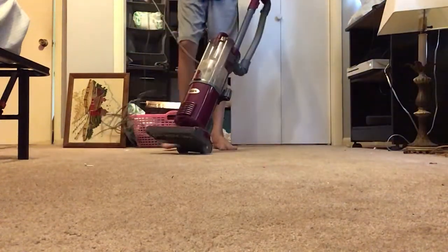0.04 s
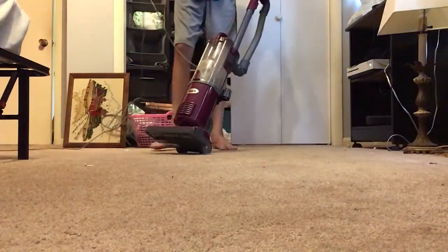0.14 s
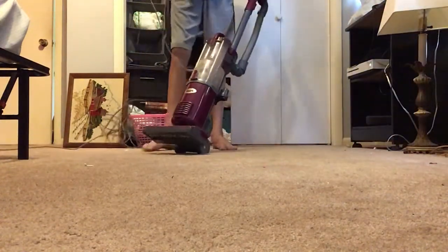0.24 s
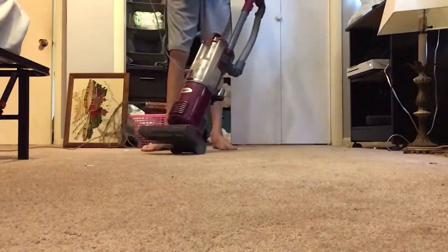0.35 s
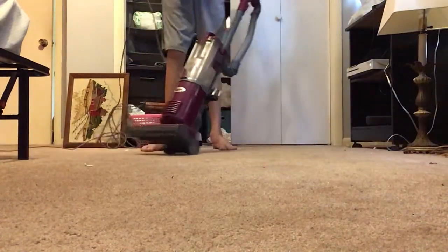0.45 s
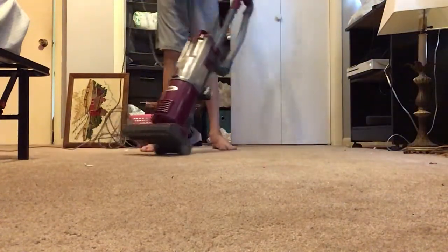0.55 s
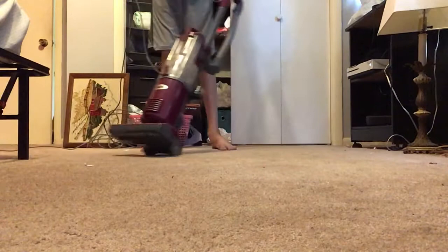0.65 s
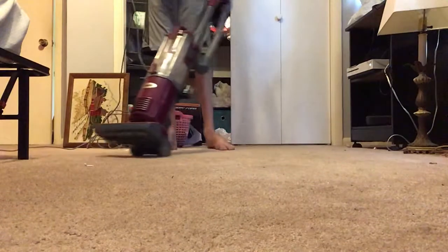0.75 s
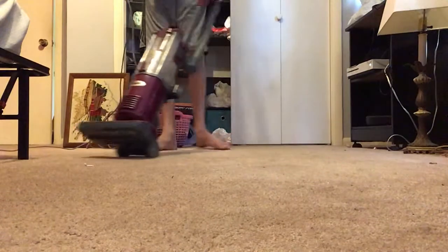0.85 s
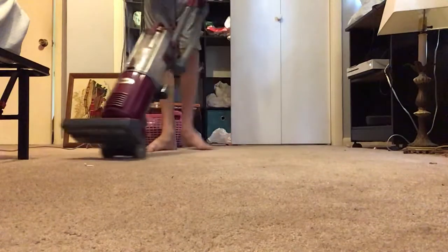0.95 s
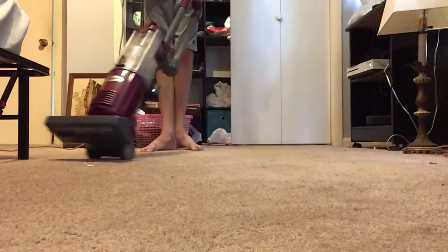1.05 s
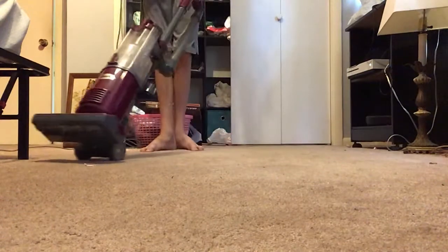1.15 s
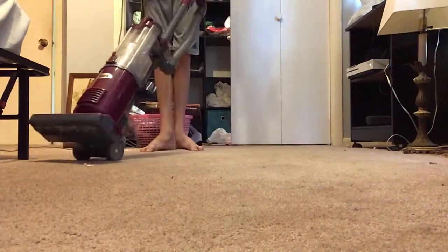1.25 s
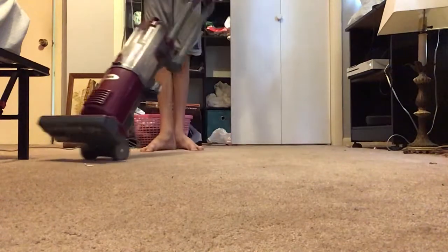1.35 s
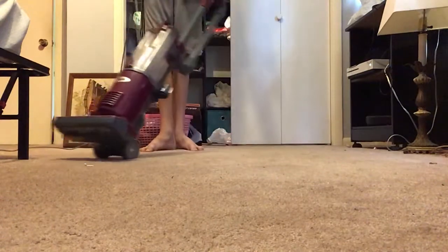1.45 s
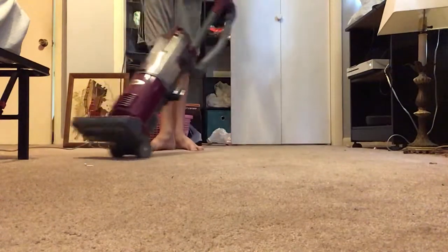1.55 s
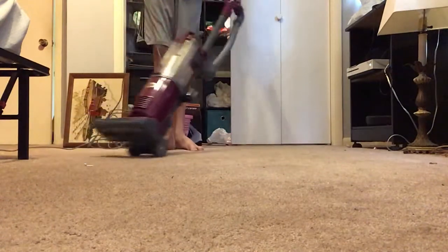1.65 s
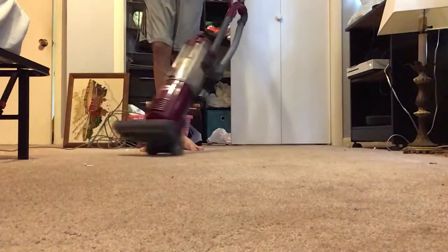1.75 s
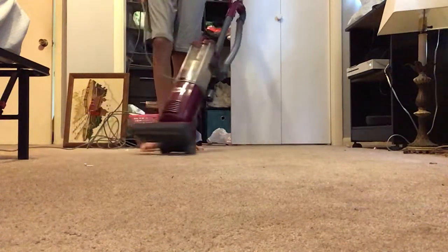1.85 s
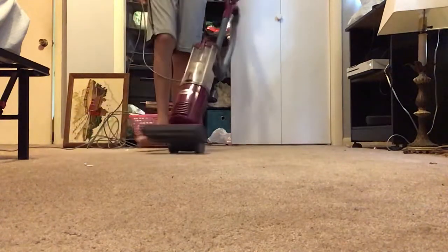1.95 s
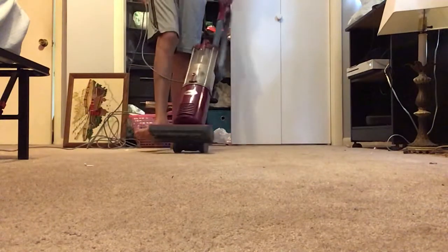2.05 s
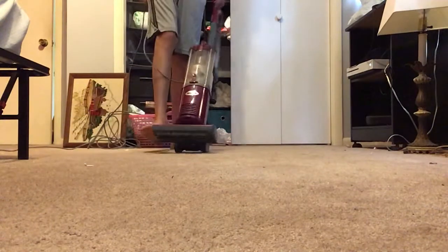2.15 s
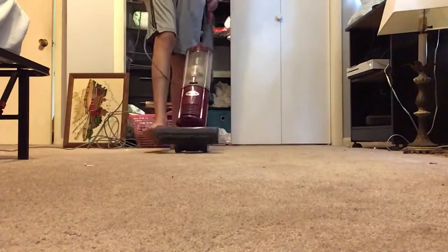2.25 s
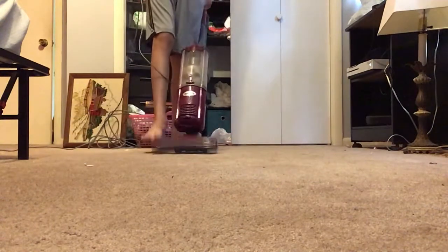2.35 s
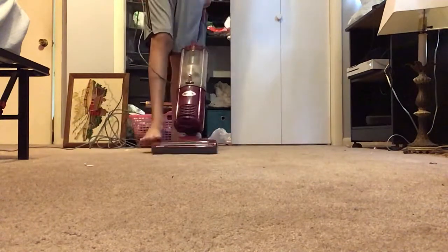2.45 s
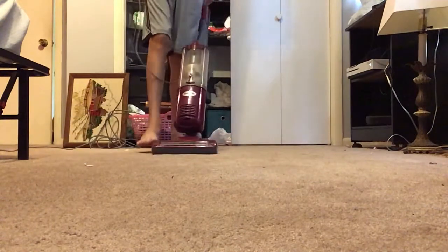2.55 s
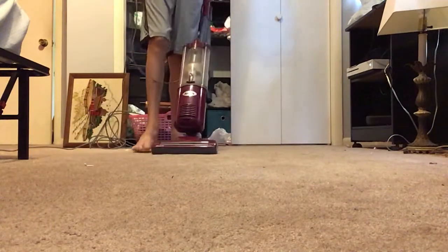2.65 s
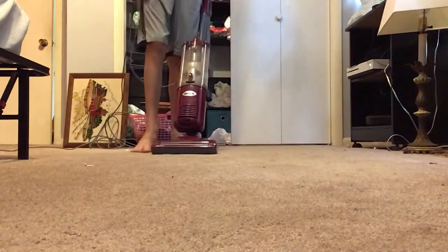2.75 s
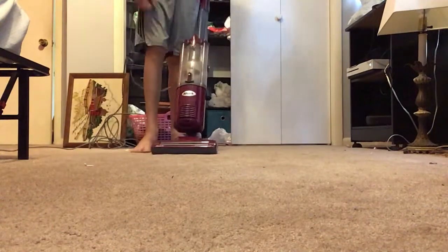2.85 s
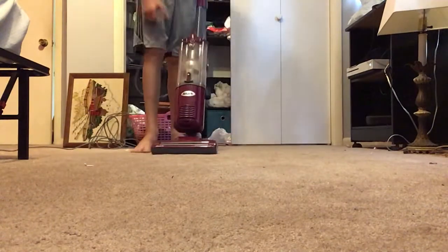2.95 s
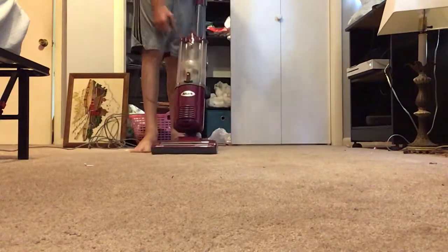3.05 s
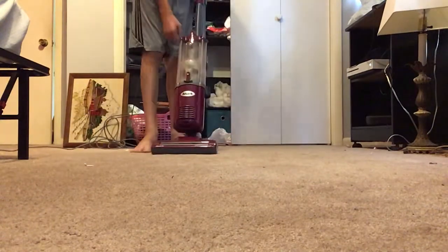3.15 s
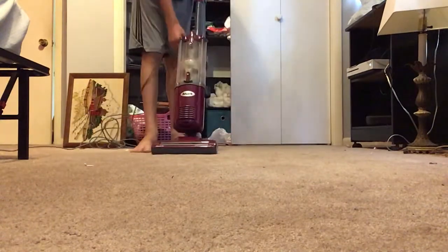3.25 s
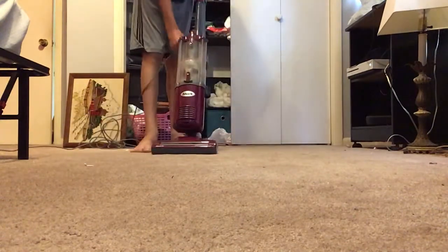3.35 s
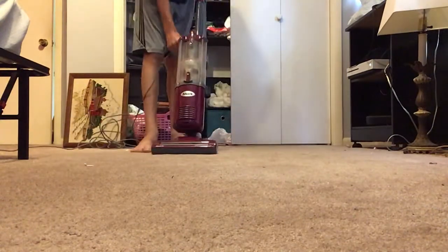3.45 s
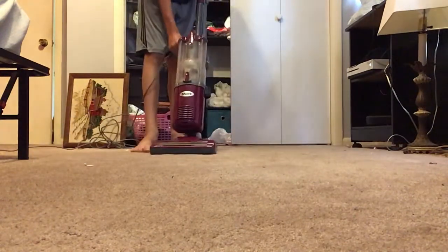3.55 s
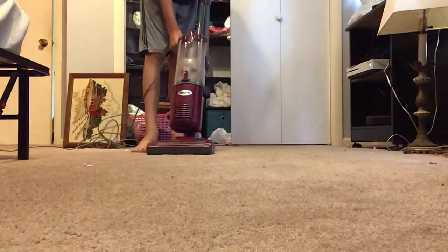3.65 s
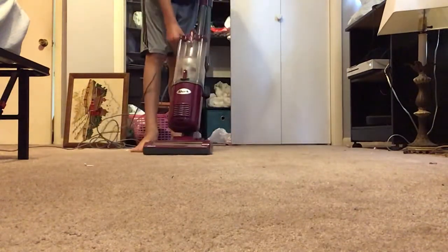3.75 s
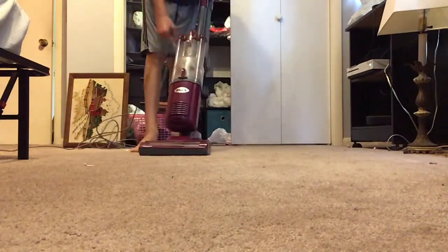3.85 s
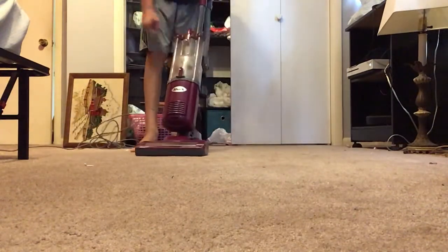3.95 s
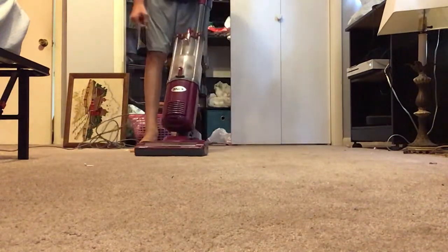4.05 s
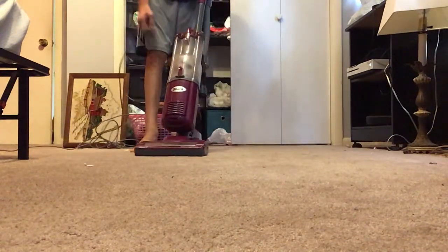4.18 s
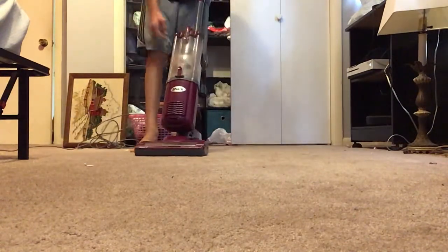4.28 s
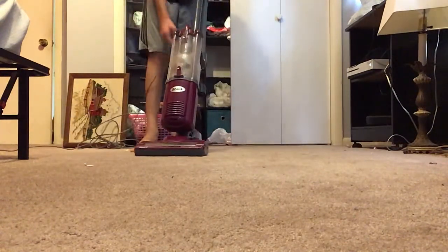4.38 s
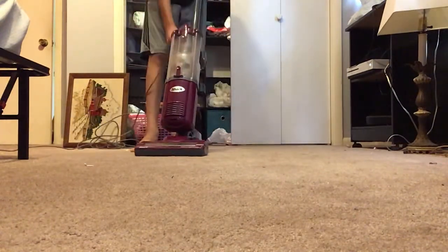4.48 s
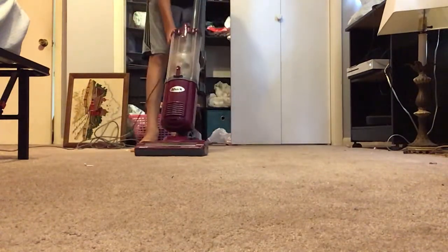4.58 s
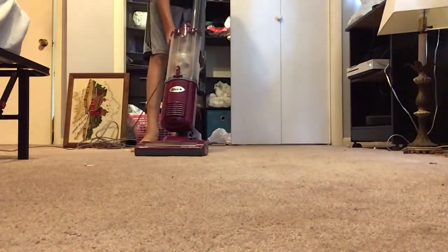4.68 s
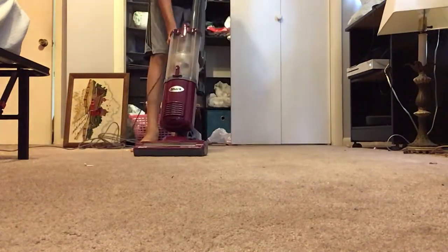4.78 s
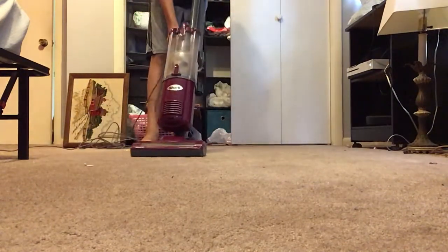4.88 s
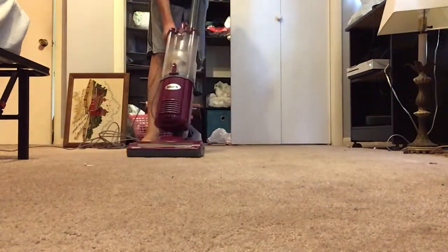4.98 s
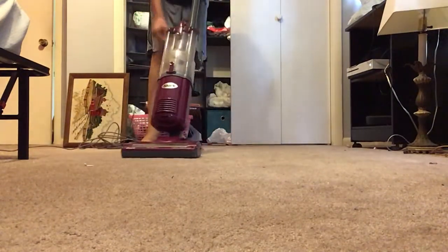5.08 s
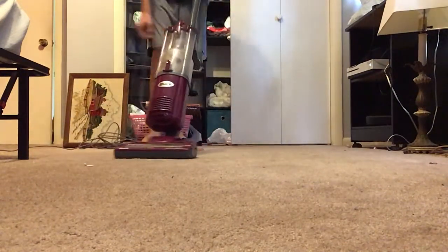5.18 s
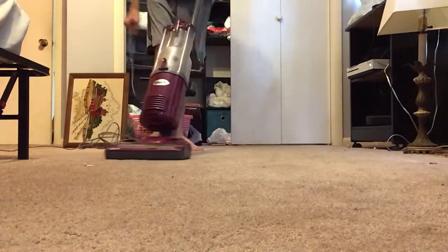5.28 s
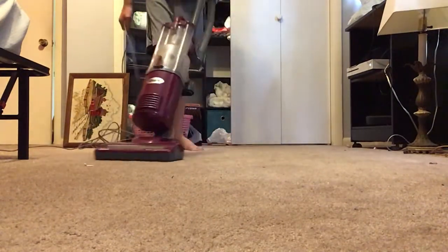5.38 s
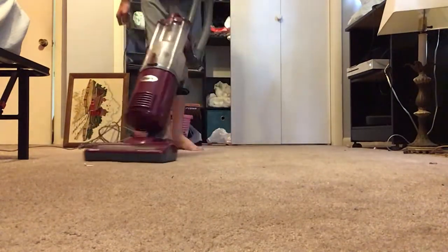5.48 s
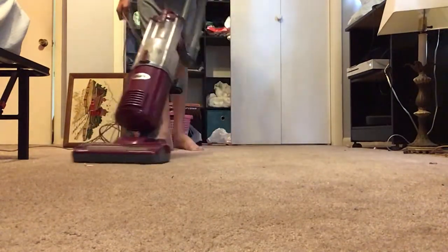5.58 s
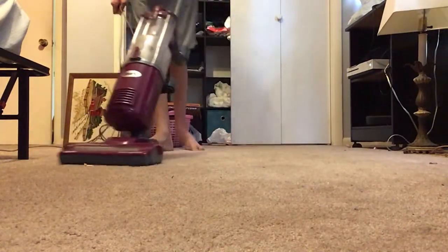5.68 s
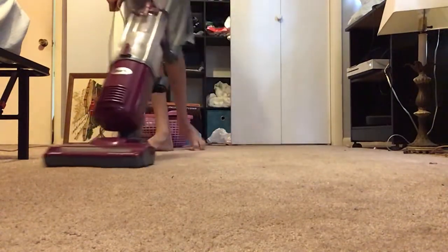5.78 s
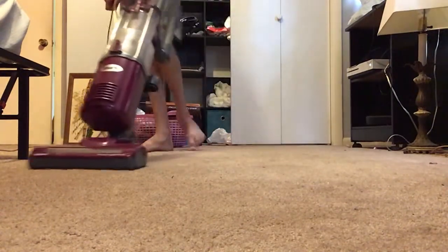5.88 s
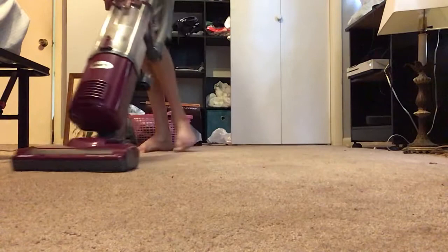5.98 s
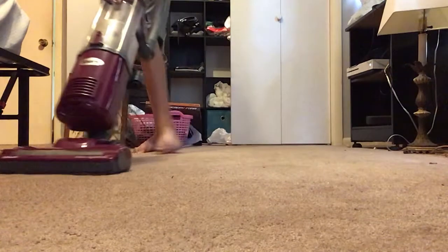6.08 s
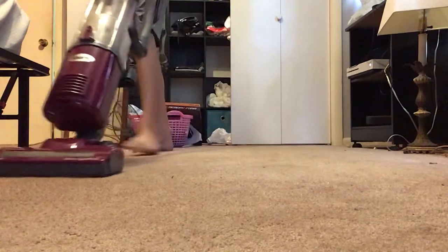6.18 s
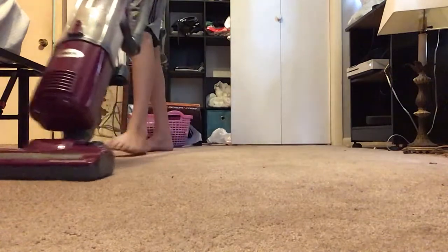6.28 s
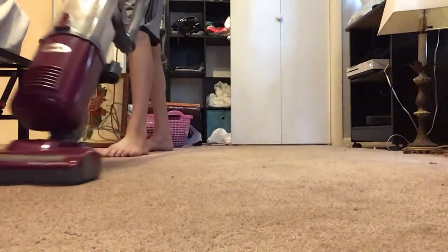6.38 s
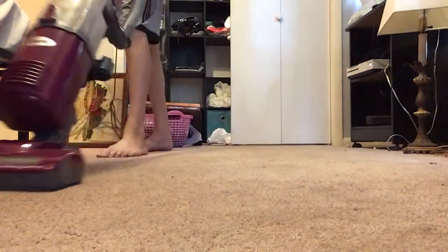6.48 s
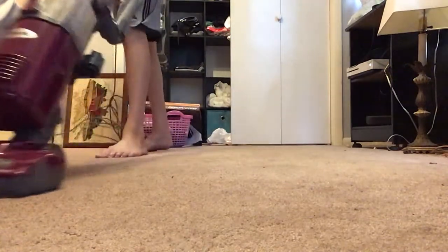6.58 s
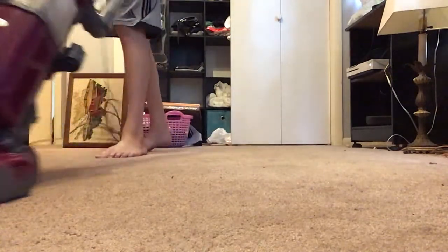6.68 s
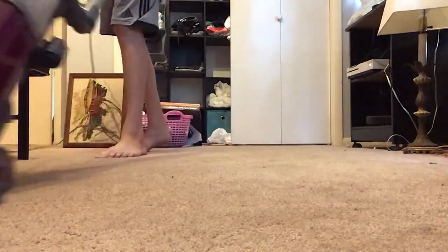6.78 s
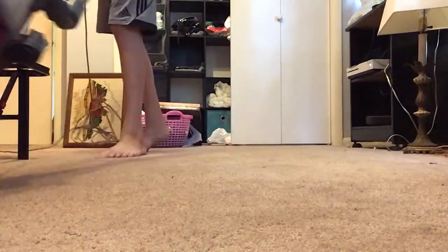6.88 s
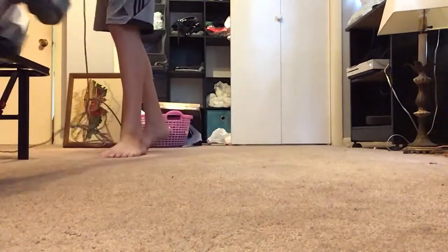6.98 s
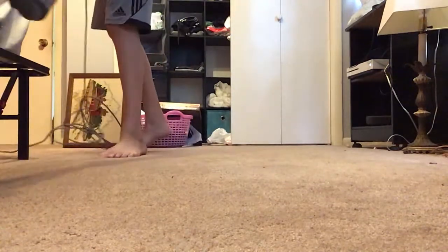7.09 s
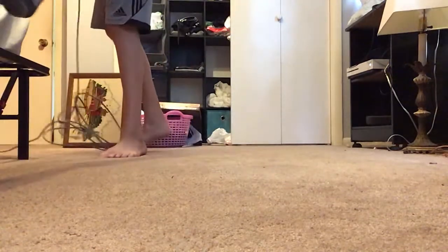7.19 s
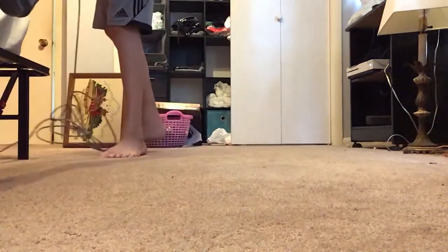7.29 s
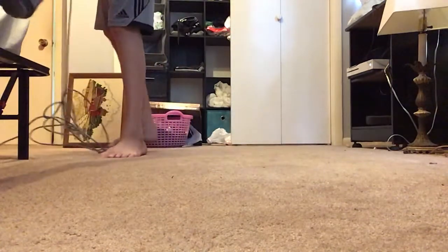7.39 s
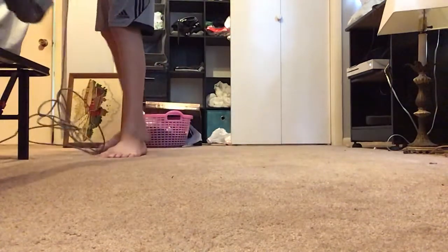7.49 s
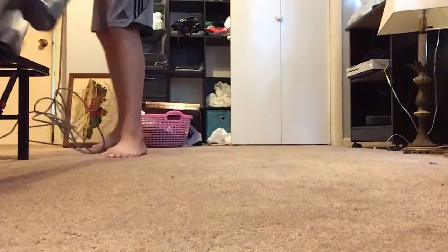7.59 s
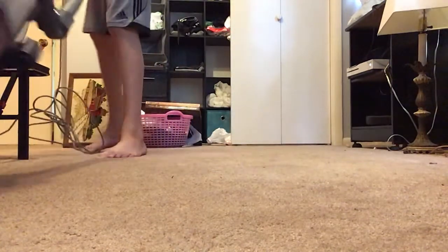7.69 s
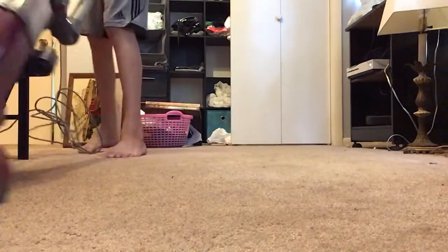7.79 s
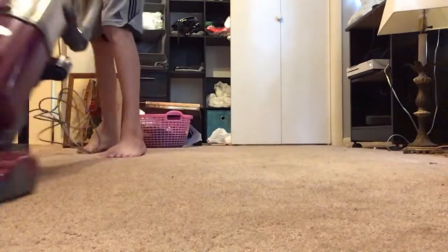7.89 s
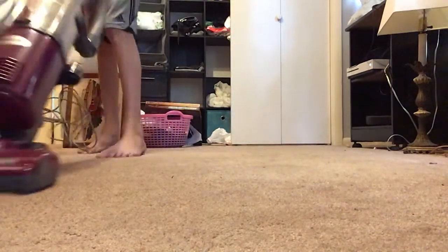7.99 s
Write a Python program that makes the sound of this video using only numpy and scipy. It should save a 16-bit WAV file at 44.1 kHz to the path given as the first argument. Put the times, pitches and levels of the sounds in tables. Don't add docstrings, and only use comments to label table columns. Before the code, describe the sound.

In a softly furnished bedroom, a switched-off upright vacuum rolls over carpet with a plastic clack, faint rattles and dull footfalls. It clicks upright with a sharp snap and a heavy floor thump. The motor bursts on, immediately winds down, then restarts into a steady roar and high whine, brush throbbing and grit ticking as it passes close to a floor-level microphone.

```python
import sys
import numpy as np
from scipy import signal
from scipy.fft import rfft, irfft, next_fast_len
from scipy.io import wavfile
from scipy.ndimage import uniform_filter1d, map_coordinates

SR = 44100
rng = np.random.default_rng(int(sys.argv[2]) if len(sys.argv) > 2 else 0)


def linear_from_db(decibels):
    return 10 ** (np.asarray(decibels, float) / 20)


def generate_wav(signal):
    frames = np.transpose(np.atleast_2d(signal))
    scaled = np.clip(frames, -1, 1) * 32767
    pcm = np.round(scaled).astype(np.int16)
    wavfile.write(sys.argv[1], SR, pcm)


N = 354123

# pitch_hz, t60_s
BEDROOM = [(200, 0.12), (2000, 0.69), (10000, 0.047)]

# start_s, level_db
STEPS = [(.02, -59), (.14, -45), (.41, -61), (.65, -51), (.88, -50), (1.16, -54), (1.4, -52), (1.6, -56),
         (1.74, -56), (1.89, -67), (2.14, -53), (2.45, -26.5), (2.75, -45.5), (2.9, -51), (3.05, -47),
         (3.2, -48.5), (3.48, -46), (4.42, -39)]
STEP_RISE_S, STEP_T60_S = .04, .65
# start_s, effort_db
PUSH = [(0, -44), (.3, -51), (.55, -55.5), (.78, -59), (.9, -54), (1.12, -55.5), (1.35, -60), (1.6, -56.5),
        (1.75, -52.5), (2.0, -60.5), (2.17, -54.5), (2.3, -61), (2.6, -59), (3.25, -60), (3.46, -53)]
# start_s, wheels_db, rustle_db
JOLTS = [
    (.12, -37, -53.5),
    (2.36, -35, -40.5),
]
JOLT_RISE_S, JOLT_T60_S = 0.044, 0.27
# pitch_hz, level_db
WHEEL_COLOUR = [(53, -55), (90, 2), (194, 0.5), (375, -5.5), (505, -9), (655, -11.5), (2000, -35.5),
                (2600, -67), (4400, -120)]
# pitch_hz, level_db
RUSTLE_COLOUR = [(470, 1), (800, -30), (953, -6.5), (2260, -3.5), (2530, -4), (9520, -11.5), (13200, -14.5),
                 (15900, -32)]
HISS_DB, RUSTLE_SHARE = -66.5, 0.38

# start_s, level_db, knock_db, edge_db
KNOCKS = [(0.0781, -21, 2, -11.5), (0.094, -26, -2, -40), (0.3, -48, 10, -30), (0.587, -34.5, -19, -15),
          (0.8354, -57, 7, -14), (0.9194, -59, 4, -12), (1.4192, -52.5, -1, -3), (1.667, -49, -13, -3.5),
          (1.709, -46, 6.5, -25), (1.8054, -58, -2, -5), (2.161, -45.5, -0.5, -7), (2.2204, -47.5, -3, -10),
          (2.276, -49, 7, -10), (2.2954, -13.5, -13, -5.5), (2.3054, -23.5, -23, -21),
          (2.3456, -32.5, 0, -16), (2.388, -37.5, -20, -7), (2.857, -55.5, 12.5, -20),
          (3.476, -35.5, -1, -11), (4.702, -34.5, -3.5, -4)]
# start_s, level_db, knock_db, edge_db
SCUFFS = [(0.015, -45, 9, -30), (0.233, -40.5, -21, -11.5), (0.598, -48.5, -12, -27),
          (3.2404, -48.5, -8, -7.5), (3.275, -42, -8, -14)]
KNOCK_T60_S, SCUFF_T60_S = 0.14, 0.37
# pitch_hz, level_db
KNOCK_COLOUR = [(35, -43), (60, -76), (235, 6.5), (888, -0.5), (1070, -43), (1200, -4), (1560, -26),
                (2640, -120)]
# pitch_hz, level_db
CLACK_COLOUR = [(530, -45), (900, -8.5), (2530, -1.5), (2870, -6.5), (3140, -2.5), (6500, -19.5),
                (8450, -58), (14300, -120)]
# pitch_hz, level_db
EDGE_COLOUR = [(3240, -15), (5500, 6.5), (8390, 4), (10400, -1.5), (13300, -4), (15900, -18)]
# start_s, level_db
THUMPS = [(0.086, -41), (2.341, -25), (2.362, -11), (2.394, -19.5), (2.435, -39)]
# pitch_hz, level_db, t60_s
FLOORBOARDS = [(68, -9, 0.51), (83.6, -7, 0.35), (106.6, 4.5, 0.25), (156.3, -8.5, 0.22),
               (229, -18.5, 0.21), (337, -5.5, 0.044)]
# pitch_hz, level_db, t60_s
SPRING = [(1700, -53.5, 0.82), (2680, -44.5, 0.35), (3040, -47, 0.31), (5240, -45, 0.39), (5240, -48, 0.36)]
# start_s, level_db
POPS = [(.017, -34), (.081, -36), (1.712, -56), (2.276, -48), (2.296, -14.5), (2.858, -56)]
# pitch_hz, level_db, t60_s
SHELL = [(620, -1.5, 0.048), (930, -18, 0.0094)]
# start_s, level_db
GRIT = [(6.054, -44), (6.0934, -31), (6.3523, -31), (6.4386, -37), (6.685, -27), (6.7888, -34), (6.93, -32),
        (6.9683, -33), (7.061, -23), (7.2315, -23), (7.2944, -24), (7.375, -23), (7.4194, -31), (7.46, -26),
        (7.571, -24), (7.6389, -40), (7.77, -35), (8.0111, -33), (4.22, -57), (4.46, -50), (4.705, -36.5)]

# start_s, share_0_to_1
POWER = [
    (3.47, 0),
    (3.5, 0.88),
    (3.72, 0.81),
    (3.84, 0.02),
    (4.688, 0.05),
    (4.706, 0.98),
]
# fan_start_s, off_s, brush_start_s
SWITCH = [
    (3.4455, 3.6586, 3.459),
    (4.6863, 9, 4.675),
]
FULL_HZ, SETTLE_PER_S, PULL_PER_TURN, COAST_S = 628.6, 5.184, .0049, 1.0165
BRUSH_UP_S, BRUSH_STOP_S, BELT_SLACK_S = .044, .125, .012
PILE_DRAG = .006
# start_s, brush_hz, nearness_db, tooth_whine_db
STROKE = [(3.52, 98.75, 4, -37.5), (3.66, 107.6, 0.5, -41.5), (4.71, 105.2, 1.5, -37),
          (4.9, 104.5, 2, -41.5), (5.05, 101.6, 1.5, -41.5), (5.38, 101.8, 0.5, -43), (5.6, 105.6, 1, -46),
          (5.9, 106.6, 1.5, -42), (6.05, 107.7, 3, -61), (6.25, 107.5, 2.5, -44.5), (6.35, 107.4, 3.5, -36),
          (6.6, 106.9, 3.5, -37.5), (6.85, 108.6, 6, -31), (7.1, 110.9, 7, -31), (7.45, 110.7, 7, -29.5),
          (7.8, 108.4, 5, -32.5), (8.03, 108.2, 3.5, -45)]

# start_s, level_db
BITES = [(3.5, -48), (3.66, -32.5), (4.95, -39), (5.1, -46), (5.24, -31), (5.8, -33), (5.95, -29),
         (6.27, -29), (6.44, -30), (7.15, -27.5), (7.27, -27), (7.46, -21.5), (7.62, -34), (7.8, -37),
         (7.92, -45), (8.02, -32)]
THROB_DB, BITE_S = -46.5, 0.064
# multiple of brush turns, level_db over rumble
BRISTLES = [(2, -10), (3, -9.5), (4, -15), (5, -17), (7, -22)]
# multiple of brush turns, level_db over whine
TEETH = [(18, 0.5), (19, -11), (20, -32), (17, -10.5), (16, -12)]

# pitch_hz, level_db
DRIVEN = [(18, -70), (30, -82), (100, -2), (141, -7), (327, -1), (511, -5), (630, -6), (682, -10),
          (1460, -14.5), (2000, -14), (3290, -14), (3850, -19), (12600, -32), (15900, -46)]
# pitch_hz, level_db
COASTING = [(35, -55), (60, -9), (249, 1), (664, -8), (900, -18.5), (1280, -25), (1690, -19.5), (2830, -17),
            (3330, -20), (3830, -25.5), (8470, -26), (14000, -35), (15900, -54)]
# pitch_hz, width_hz, level_db
DUCTS = [(2830, 290, 4), (3290, 430, -6.5), (3920, 490, 8.5), (4797, 120, 8.5), (5740, 290, 3.5),
         (7730, 200, 3.5), (14800, 2000, 3)]
# driven_db at full speed, dB per dB of speed, coasting_db,
# dB per dB of speed, share of nearness
FLOWS = [(-30.5, 0.83, -32, 1.84, 0.64), (-35.5, 1.66, -35.5, 2.23, 1), (-38, 2, -44, 2, 0.4)]
SPIN_UP_S = 0.022

# multiple of shaft turns, level_db over hiss, blur_rad
FAN_ORDERS = [(12, -22, .9), (14, -23.5, .9), (21, -22, 1.2), (24, -25, 1.5), (36, -25, 3), (48, -22, 3.2)]
# multiple of shaft turns, level_db
BEARING = [(2.64, -58), (4.36, -58.5)]
# pitch_hz, width_hz, level_db
BLADE_PATH = [(1704, 236, 19.5), (2230, 590, 6.8), (2764, 350, 21.4), (3086, 340, 16), (3950, 460, 25.2),
              (4257, 610, 13)]
BLADE_DB, STALL_DB = -64.5, 3
# pitch_hz, level_db
SHAFT_PATH = [(170, -62), (215, -52), (255, -43), (300, -57), (400, -52), (470, -56), (550, -34),
              (628, -38)]


def unit(x):
    return x / np.sqrt(np.mean(x ** 2) + 1e-20)


def along(points, hz):
    f, v = np.transpose(points)
    return np.interp(np.log(hz + 1), np.log(f + 1), v)


def curves(rows):
    s, *columns = np.transpose(rows)
    return [np.interp(np.arange(N) / SR, s, column) for column in columns]


def resonances(rows, hz):
    return sum(db / (1 + (2 * (hz - centre) / width) ** 2) for centre, width, db in rows)


def decay(t, t60):
    return linear_from_db(-60 * t / t60)


def swells(rows, rise, t60):
    t = np.arange(N) / SR
    total = 0
    for s, db in rows:
        rising = np.exp(-((t - s) / rise) ** 2)
        total = total + linear_from_db(db) * np.where(t < s, rising, decay(np.maximum(t - s, 0), t60))
    return total


def wobble(rate):
    knots = rng.standard_normal(int(N * rate / SR) + 4)
    return map_coordinates(knots, [np.arange(N) * rate / SR])


def noise(response, patchy_db=0.):
    z = signal.stft(rng.standard_normal(N + 512), nperseg=512)[2]
    patches = uniform_filter1d(uniform_filter1d(rng.standard_normal(z.shape), 6, 0), 10, 1)
    x = signal.istft(z * linear_from_db(patchy_db * unit(patches)), nperseg=512)[1]
    m = next_fast_len(len(x))
    return unit(irfft(rfft(x, m) * response(np.fft.rfftfreq(m, 1 / SR)), m)[:N])


def coloured(points, patchy_db):
    return noise(lambda hz: linear_from_db(along(points, hz)), patchy_db)


def tone(turns, multiple, flutter_db, blur, rate):
    phase = 2 * np.pi * multiple * turns + blur * wobble(rate) + rng.uniform(0, 2 * np.pi)
    return np.sqrt(2) * linear_from_db(flutter_db * wobble(rate)) * np.sin(phase)


def rings(s, db, modes, attack, blur):
    t = np.arange(SR) / SR
    ring = 0
    for hz, level, t60 in modes:
        drift = blur * np.cumsum(rng.standard_normal(SR)) / np.sqrt(SR)
        ring = ring + linear_from_db(level) * decay(t, t60) * np.sin(2 * np.pi * hz * t + drift)
    onset = 1 - np.exp(-(t / attack) ** 2)
    return np.pad(linear_from_db(db) * ring * onset, (round(s * SR), N))[:N]


def bedroom(x, wet_db):
    hz, t, z = signal.stft(rng.standard_normal(SR // 2), SR, nperseg=256)
    tail = signal.istft(z * decay(t, along(BEDROOM, hz)[:, None]), SR, nperseg=256)[1]
    return x + linear_from_db(wet_db) * signal.fftconvolve(x, tail / np.linalg.norm(tail))[:N]


def cloth_and_hiss():
    push_db, = curves(PUSH)
    jolts = swells([(s, rustle_db) for s, _, rustle_db in JOLTS], JOLT_RISE_S, JOLT_T60_S)
    level = linear_from_db(HISS_DB + RUSTLE_SHARE * (push_db - push_db.min())) + jolts
    return level * coloured(RUSTLE_COLOUR, patchy_db=1)


def feet_and_wheels():
    push_db, = curves(PUSH)
    boom = noise(lambda hz: 1 / (1 + ((hz - 78) / 24) ** 2) / (1 + (52 / (hz + 1)) ** 6))
    steps = linear_from_db(-3.5) * swells(STEPS, STEP_RISE_S, STEP_T60_S) * boom
    jolts = swells([(s, wheels_db) for s, wheels_db, _ in JOLTS], JOLT_RISE_S, JOLT_T60_S)
    lumps = unit(linear_from_db(2.5 * wobble(30)) * coloured(WHEEL_COLOUR, patchy_db=1.5))
    wheels = linear_from_db(1.0) * (linear_from_db(push_db) + jolts) * lumps
    rest = linear_from_db(np.interp(np.arange(N) / SR, [3.5, 3.7], [0, -18]))
    return rest * (steps + wheels)


def knocks():
    t = np.arange(SR // 2) / SR
    onset = 1 - np.exp(-t / 0.0011)
    low, mid, top = np.zeros((3, N + SR))
    contacts = [(*row, KNOCK_T60_S) for row in KNOCKS] + [(*row, SCUFF_T60_S) for row in SCUFFS]
    for s, db, knock_db, edge_db, t60 in contacts:
        i = round(s * SR)
        shape = (0.32 * decay(t, 0.0046) + decay(t, t60)) * onset
        low[i:][:len(t)] += linear_from_db(db + knock_db - 4.5) * decay(t, 0.96 * t60) * onset
        mid[i:][:len(t)] += linear_from_db(db - 10.5) * shape
        top[i:][:len(t)] += linear_from_db(db + edge_db - 5.0) * shape
    rattle = linear_from_db(1.5 * wobble(160))
    layers = (low, KNOCK_COLOUR), (mid, CLACK_COLOUR), (top, EDGE_COLOUR)
    return rattle * sum(level[:N] * coloured(colour, patchy_db=3) for level, colour in layers)


def thumps():
    return sum(rings(s, db, FLOORBOARDS, attack=0.0061, blur=0) for s, db in THUMPS)


def latch_and_bin():
    spring = rings(2.39, 0, SPRING, attack=.02, blur=26)
    return spring + sum(rings(s, db, SHELL, attack=0.00094, blur=41) for s, db in POPS)


def grit():
    t = np.arange(5000) / SR
    tick = 2.4 * decay(t, 0.0051)
    puff = decay(t, 0.17) * (1 - np.exp(-t / .005))
    bursts = np.zeros(N + SR)
    for s, db in GRIT:
        bursts[round(s * SR):][:len(t)] += linear_from_db(db - 10) * (tick + puff)
    return bursts[:N] * noise(lambda hz: 1 / (1 + ((hz - 11500) / 2800) ** 4), patchy_db=2.5)


def brush_hz():
    t = np.arange(N) / SR
    share = 0
    for _, off, on in SWITCH:
        up = 1 - np.exp(-np.maximum(t - on, 0) / BRUSH_UP_S)
        share = share + up * np.exp(-np.maximum(t - off - BELT_SLACK_S, 0) / BRUSH_STOP_S)
    return share * curves(STROKE)[0]


def fan_hz():
    t, hz = np.arange(N) / SR, np.full(N, 1.)
    for on, off, _ in SWITCH:
        lack = FULL_HZ - hz[round(on * SR)]
        grow = np.exp(SETTLE_PER_S * (np.clip(t, on, off) - on))
        up = FULL_HZ - SETTLE_PER_S / ((SETTLE_PER_S / lack + PULL_PER_TURN) * grow - PULL_PER_TURN)
        hz = np.where(t < on, hz, up * np.exp(-np.maximum(t - off, 0) / COAST_S))
    return hz


def flow_db():
    t, near_db = np.arange(N) / SR, curves(STROKE)[1]
    speed_db = 20 * np.log10(fan_hz() / FULL_HZ)
    built_db = 20 * np.log10(1.001 - np.exp(-np.maximum(t - POWER[0][0], 0) / SPIN_UP_S))
    return [(db + grows * speed_db + share * near_db + built_db, idle_db + fades * speed_db + built_db)
            for db, grows, idle_db, fades, share in FLOWS]


def brush_beats(turns):
    rumble_db = flow_db()[0][0]
    bite = linear_from_db(THROB_DB) + swells(BITES, BITE_S, t60=0.32)
    throb = bite * linear_from_db(-6.0) * tone(turns, 1, flutter_db=-0.5, blur=0.17, rate=14)
    beats = sum(linear_from_db(db) * tone(turns, k, flutter_db=4, blur=.8, rate=10) for k, db in BRISTLES)
    return curves(POWER)[0] * (throb + linear_from_db(rumble_db + 0.23) * beats)


def tooth_whine(turns):
    whine_db, power = curves(STROKE)[2], curves(POWER)[0]
    rough = .3 + 200 * np.minimum(np.abs(np.gradient(brush_hz())), .012)
    whine = sum(linear_from_db(db) * tone(turns, k, flutter_db=1.5, blur=rough, rate=110) for k, db in TEETH)
    return np.sqrt(np.abs(power)) * (power > .1) * linear_from_db(whine_db - 4.0) * whine


def roar(brush_turns):
    power, = curves(POWER)

    def above(hz, edge):
        return 1 / (1 + (edge / (hz + 1)) ** 8)

    bands = [lambda hz: 1 - above(hz, 900),
             lambda hz: above(hz, 900) - above(hz, 6000),
             lambda hz: above(hz, 6000)]
    chop, sway_db = [.35, 0.12, 0.15], [.7, 0.26, 0.74]
    total = 0
    for (driven_db, idle_db), band, depth, sway in zip(flow_db(), bands, chop, sway_db):

        def air(colour):
            return noise(lambda hz: linear_from_db(along(colour, hz) + resonances(DUCTS, hz))
                         * np.sqrt(np.abs(band(hz))), patchy_db=1.0)

        beat = 1 + depth * np.sin(2 * np.pi * brush_turns + wobble(20))
        driven = np.sqrt(power) * linear_from_db(driven_db) * beat * air(DRIVEN)
        coasting = np.sqrt(1 - power) * linear_from_db(idle_db) * air(COASTING)
        total = total + linear_from_db(-1.94 + sway * wobble(9) + 0.46 * wobble(14)) * (driven + coasting)
    return total


def fan():
    hz, power = fan_hz(), np.clip(curves(POWER)[0], 0, 1)
    turns = np.cumsum(hz) / SR
    driven_db, idle_db = flow_db()[2]
    hiss_db = power * driven_db + (1 - power) * idle_db

    shaft_db = along(SHAFT_PATH, hz) + 0.75 * curves(STROKE)[1]
    x = linear_from_db(shaft_db - 1.5) * tone(turns, 1, flutter_db=4.5 - 3 * power, blur=.8 - .55 * power, rate=15)

    blade_db = BLADE_DB + resonances(BLADE_PATH, 7 * hz)
    torn = np.clip(np.gradient(hz) * SR / 1000, 0, 4)
    x += linear_from_db(blade_db - 2.2 - STALL_DB * torn) * tone(turns, 7, flutter_db=3, blur=.6 + .6 * torn, rate=40)

    for k, db, blur in FAN_ORDERS:
        in_band = 1 / (1 + (k * hz / 13500) ** 12)
        level = linear_from_db(hiss_db + db + 10 * (1 - power)) * in_band
        x += level * tone(turns, round(k), flutter_db=4, blur=blur, rate=120)

    for k, db in BEARING:
        casing = 1 / (1 + ((k * hz - 900) / 90) ** 2)
        x += linear_from_db(db) * (casing + .05) * tone(turns, k, flutter_db=3.5, blur=.4, rate=22)
    return x * (np.arange(N) > POWER[0][0] * SR)


def scene():
    turns = np.cumsum(brush_hz() * (1 + PILE_DRAG * wobble(8))) / SR
    handling = cloth_and_hiss() + feet_and_wheels() + knocks() + thumps() + latch_and_bin()
    whines = bedroom(tooth_whine(turns) + fan(), wet_db=-16)
    mono = handling + grit() + brush_beats(turns) + roar(turns) + whines
    return np.array([mono, mono])


def band_limit(x):
    return signal.sosfilt(signal.butter(12, 16170, fs=SR, output="sos"), x)


def record(dry):
    ceiling = .3
    rounded = dry / (1 + (dry / ceiling) ** 4) ** (1 / 4)
    bass_cut = signal.butter(4, 50 / (SR / 2), "high", output="sos")
    treble_cut = signal.ellip(10, .3, 70, 15850 / (SR / 2), output="sos")
    return band_limit(signal.sosfilt(np.vstack([bass_cut, treble_cut]), rounded))


dry = scene()
out = record(dry)
generate_wav(out)
```